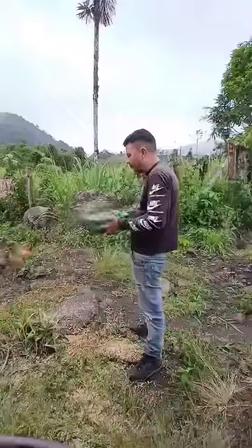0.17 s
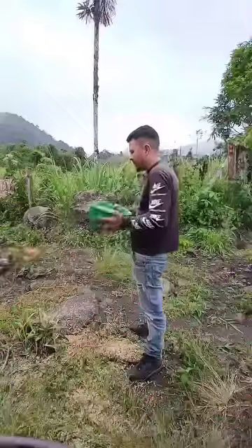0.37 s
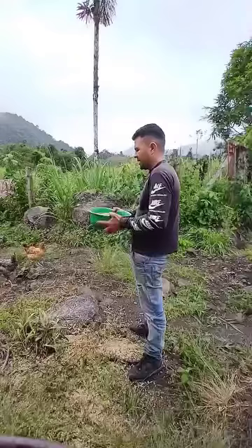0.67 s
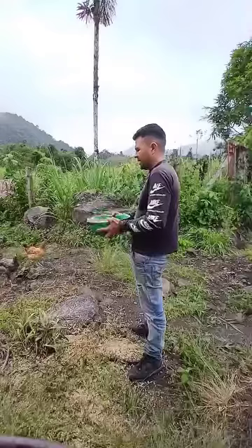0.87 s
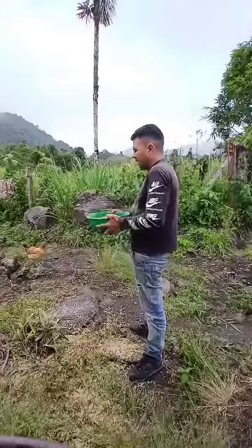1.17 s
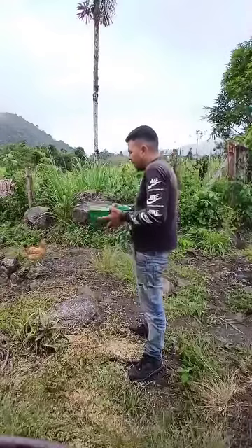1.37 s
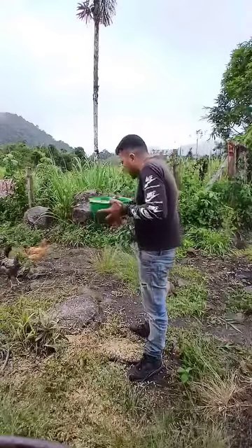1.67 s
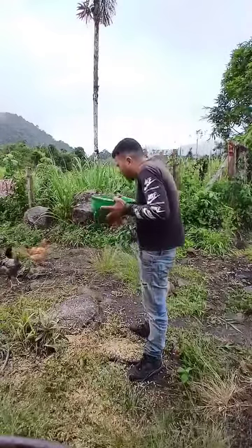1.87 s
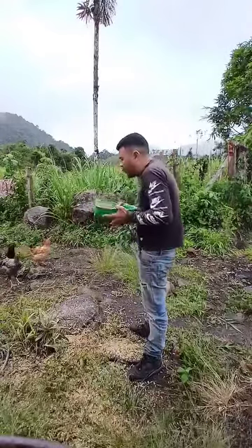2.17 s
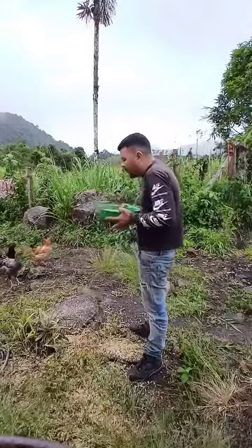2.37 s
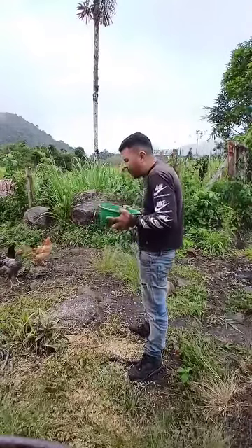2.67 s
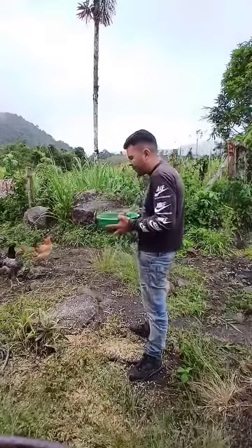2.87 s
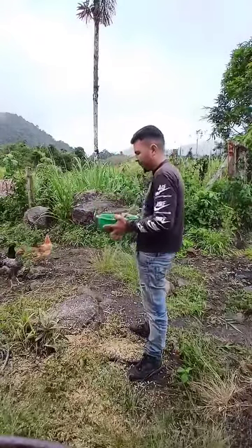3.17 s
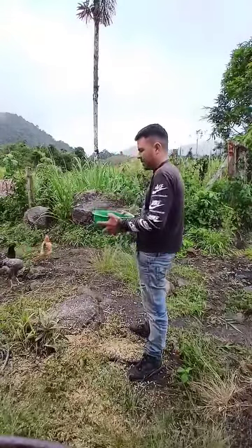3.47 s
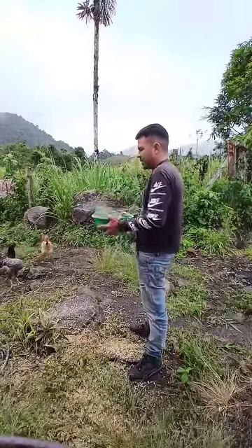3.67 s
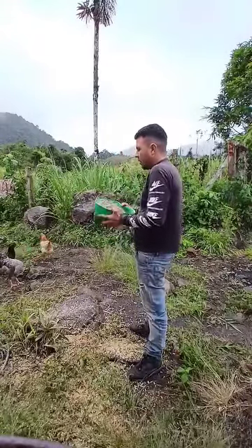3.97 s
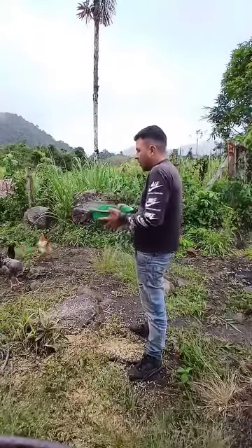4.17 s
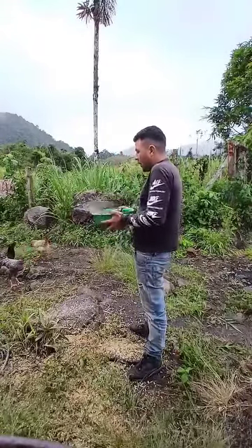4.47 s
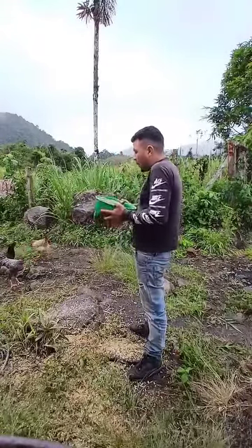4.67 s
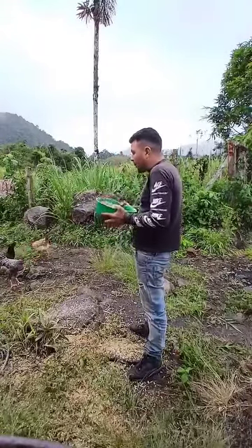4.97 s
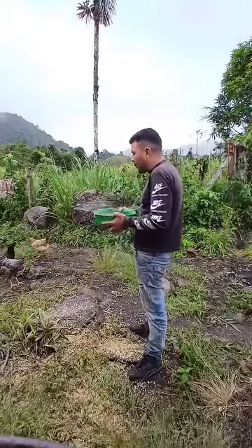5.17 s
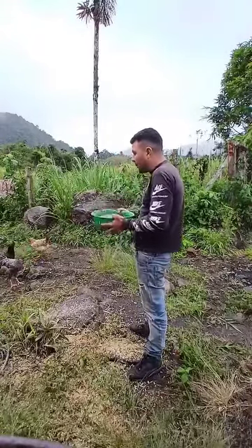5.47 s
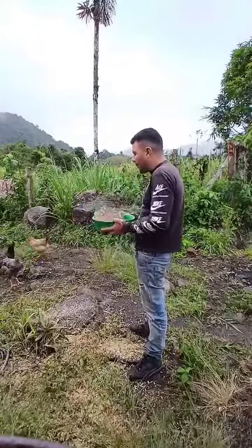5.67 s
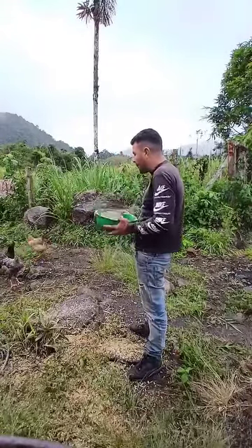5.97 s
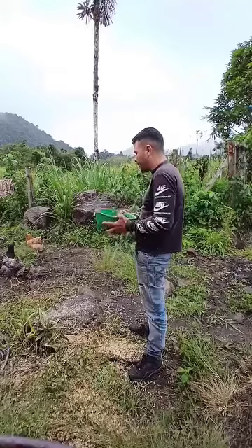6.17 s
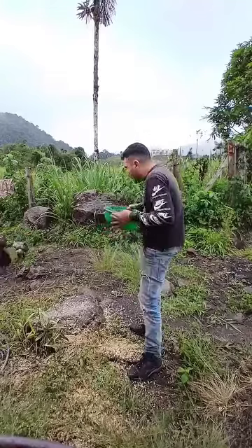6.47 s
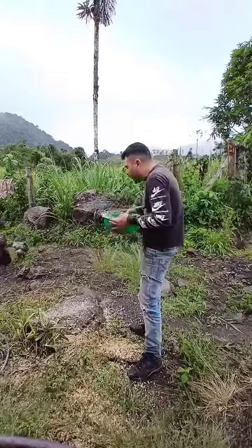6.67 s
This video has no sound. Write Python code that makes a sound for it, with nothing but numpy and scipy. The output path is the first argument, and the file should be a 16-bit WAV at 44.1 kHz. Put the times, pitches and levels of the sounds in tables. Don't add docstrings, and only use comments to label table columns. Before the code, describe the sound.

Steady rhythmic shaking of dried beans in a small plastic bowl, thudding and rattling, with a few faint hen clucks in open air.

```python
import sys
import numpy as np
from scipy import signal
from scipy.io import wavfile
from scipy.ndimage import uniform_filter1d

SR = 44100
rng = np.random.default_rng(int(sys.argv[2]) if len(sys.argv) > 2 else 0)


def generate_wav(signal):
    frames = np.transpose(np.atleast_2d(signal))
    scaled = np.clip(frames, -1, 1) * 32767
    pcm = np.round(scaled).astype(np.int16)
    wavfile.write(sys.argv[1], SR, pcm)


def how_loud(loudness_db):
    steps = np.asarray(loudness_db, float) / 20
    return 10 ** steps


N = 300321

# time in seconds, rattle peak in dB, husk peak in dB.
BEAN_DROPS = [(0.108, -35, -48.5), (0.653, -40.5, -59), (1.29, -40.5, -50), (1.331, -49.5, -56.5),
              (1.575, -50, -80), (1.696, -31, -71), (1.821, -43, -66), (2.797, -16, -34), (2.885, -44, -67),
              (2.936, -40, -73), (3.08, -16, -39), (3.386, -23, -48), (3.462, -36.5, -43),
              (3.799, -36.5, -57), (4.109, -36.5, -50), (4.306, -39.5, -68), (4.443, -24, -45),
              (4.536, -32, -47.5), (4.62, -47, -68.5), (4.782, -17.5, -34), (4.907, -38.5, -65.5),
              (5.197, -48, -62), (5.411, -16.5, -32.5), (5.727, -26, -50), (5.794, -39.5, -53),
              (5.914, -40, -60), (6.146, -37, -54), (6.548, -37.5, -60), (6.71, -29, -58),
              (6.769, -30, -51)]
# frequency in Hz, likeness from 0 to 1.
PORT_LIKENESS = [(60, .72), (250, .75), (500, .98), (800, .9), (1100, .8), (1400, .5), (1900, .35),
                 (3000, .7), (4500, .3), (7000, .3), (8200, .7), (9500, .3)]


def beans():
    # frequency in Hz, level in dB.
    bottom_colour = [(400, -9), (440, -20), (480, 4.5), (520, -2.5), (565, 8.5), (610, -1), (650, -6.5)]
    wall_colour = [(600, -30), (720, 9), (800, -2), (900, 4.5), (1000, 1), (1200, -3)]
    rattle_colour = [(1100, -21.5), (1450, -5), (1800, -1.5), (2100, -3), (2350, 2), (3100, -2.5),
                     (3500, -5.5), (3900, -7.5), (4600, -12.5)]
    husk_colour = [(4500, 0.5), (5400, 2.5), (5900, -2.5), (6800, -6.5), (7700, -5), (8200, -14),
                   (9400, -21), (10000, 3.5)]
    # time in seconds, peak in dB, pitch in Hz.
    thuds = [(0.042, -5.5, 729), (0.454, -14, 568), (0.8, 1.5, 709), (1.079, -29, 595), (1.389, -3, 680),
             (1.672, -11.5, 816), (1.967, 6, 844), (2.187, -26, 755), (2.208, 0, 750), (2.466, -5.5, 715),
             (2.754, -1.5, 710), (3.025, -36, 534), (3.041, -34.5, 735), (3.334, 5.5, 563),
             (3.682, -33.5, 736), (4.038, -3.5, 780), (4.389, -2, 620), (4.396, -2.5, 704), (4.739, 0, 762),
             (5.046, 5, 535), (5.361, -4.5, 792), (5.691, -11.5, 710), (6.007, 0.5, 765),
             (6.318, -5.5, 920), (6.608, 4.5, 700), (6.624, -16, 760)]

    bottom, wall, rattle, husk = tosses()
    _, rattle_peak_db, husk_peak_db = np.transpose(BEAN_DROPS)
    rattle = with_drops(rattle - 0.6, rattle_peak_db - 2.5, t60=0.023)
    husk = with_drops(husk + 2.1, husk_peak_db + 3.5, t60=0.015)

    heap = contacts(bottom_colour, bottom - 1.5, per_s=2000, spread_db=3.0, cycles=18.1,
                    patchy_db=1.5, lumpy_db=-5.0, even_s=0.015, count=10)
    heap += contacts(wall_colour, wall - 9.5, per_s=3000, spread_db=0.5, cycles=17.5,
                     patchy_db=5.0, lumpy_db=3.0, even_s=0.015, count=10)
    heap += contacts(rattle_colour, rattle, per_s=11000, spread_db=1.5, cycles=97.5,
                     patchy_db=2.5, lumpy_db=2.5, even_s=0.013, count=22)
    heap += contacts(husk_colour, husk, per_s=16000, spread_db=-2.5, cycles=132,
                     patchy_db=3.0, lumpy_db=7.5, even_s=0.0055, count=16)
    heap += blows(thuds, offset_db=-17.5, cycles=13.8)
    return small_bowl(heap)


def tosses():
    # start in seconds, bottom in dB, wait for the wall in seconds,
    # wall in dB, beans left rolling in dB.
    landings = [(0.044, -28.5, 0.01, -26.5, -48.5), (0.452, -27, 0.017, -26.5, -49.5),
                (0.783, -30, 0.023, -32, -54), (1.075, -34, 0.017, -32.5, -52.5),
                (1.382, -32.5, 0.013, -29, -61), (1.659, -51, 0.022, -44, -41.5),
                (1.951, -34.5, 0.013, -27, -63), (2.208, -36, 0.0025, -31, -55.0),
                (2.474, -34, 0.018, -26.5, -51.5), (2.755, -32.5, 0.014, -26, -52.5),
                (3.028, -30.0, 0.019, -23, -57), (3.34, -29, 0.021, -25, -53),
                (3.674, -25.5, 0.02, -22.5, -53), (4.035, -28.5, 0.014, -22.5, -52.5),
                (4.378, -25.5, 0.02, -23, -51.5), (4.728, -29.5, 0.018, -22.5, -50.5),
                (5.039, -25.5, 0.02, -24.5, -52.5), (5.353, -32.5, 0.018, -24, -53.0),
                (5.68, -31, 0.012, -20, -52), (6.003, -28.5, 0.019, -24.5, -53),
                (6.314, -39.5, 0.0071, -30.5, -51.5), (6.591, -29.5, 0.013, -22.5, -47)]
    # start in seconds, length in seconds, rattle in dB,
    # bean trickle left in dB, husk trickle left in dB.
    slides = [(0.038, 0.074, -26.5, -58.5, -62.5), (0.443, 0.092, -27, -54.5, -62),
              (0.798, 0.038, -27.0, -68.0, -67.5), (1.092, 0.027, -29, -59, -66),
              (1.391, 0.025, -27, -64.5, -84.5), (1.681, 0.0048, -42, -53.0, -59.5),
              (1.958, 0.029, -28, -55, -60), (2.214, 0.034, -28.5, -61.5, -63),
              (2.49, 0.043, -26.5, -58.0, -61), (2.758, 0.054, -28, -56.5, -63.5),
              (3.037, 0.055, -27.5, -51.5, -71), (3.33, 0.063, -28, -71.5, -68),
              (3.667, 0.072, -27.5, -58.0, -70.0), (4.018, 0.09, -29, -62, -77),
              (4.366, 0.078, -27, -48.5, -60.5), (4.709, 0.08, -29.5, -50.5, -61),
              (5.023, 0.079, -29, -47.5, -60.5), (5.35, 0.069, -28.5, -56.5, -59.5),
              (5.671, 0.066, -25.5, -49, -60.5), (6.0, 0.064, -26.5, -53, -61),
              (6.327, 0.0022, -23.5, -54.0, -60.5), (6.593, 0.051, -24.5, -36, -50.5)]
    # first beans' rise in dB/s, how far they lie under the peak in dB,
    # main rise in dB/s, swell in dB/s, fall in dB/s, its quickening in dB/s2, trickle fade in dB/s.
    bottom_moves = (390, 18, 740, 18, 267, 740, 33)
    wall_moves = (274.5, 9.5, 489, -54, 270, 599.5, 24)
    rattle_moves = (407, 8.8, 640, 82.4, 304, 870, 29.5)
    husk_moves = (400, 33, 537, 17, 265, 1300, 39.4)
    bottom_hold_s, wall_hold_s, husk_lag_s = 0.012, 0.0077, 0.0056
    bottom_roll_db, husk_under_db = -15, -14

    land_s, bottom_db, wall_lag_s, wall_db, roll_db = np.transpose(landings)
    slide_s, length_s, rattle_db, trickle_db, chaff_db = np.transpose(slides)
    bottom = stream(land_s, bottom_hold_s, bottom_db, roll_db + bottom_roll_db, bottom_moves)
    wall = stream(land_s + wall_lag_s, wall_hold_s, wall_db, roll_db, wall_moves)
    rattle = stream(slide_s, length_s, rattle_db, trickle_db, rattle_moves)
    husk = stream(slide_s + husk_lag_s, length_s, rattle_db + husk_under_db, chaff_db, husk_moves)
    return bottom, wall, rattle, husk


def stream(start_s, hold_s, peak_db, trickle_db, moves):
    first, under_db, rise, swell, fall, quicken, fade = moves
    since = np.arange(0, N + 64, 64) / SR - start_s[:, None]
    hold = np.broadcast_to(hold_s, start_s.shape)[:, None]
    peak = peak_db[:, None]
    after = since - hold
    climb = rise * np.minimum(since, 0) + swell * np.clip(after, -hold, 0)
    drop = -(fall + quicken * np.abs(after)) * after
    main = peak + np.minimum(climb, drop)
    early = peak - under_db + np.minimum(first * since, -2000 * since)
    late = trickle_db[:, None] + np.minimum(-fade * after, 2000 * after)
    power = np.sum(how_loud(2 * main) + how_loud(2 * early) + how_loud(2 * late), axis=0)
    return np.interp(np.arange(N) / 64, np.arange(len(power)), 10 * np.log10(power + 1e-10))


def with_drops(level_db, peaks_db, t60):
    hits = np.zeros(N)
    hits[[round(row[0] * SR) for row in BEAN_DROPS]] = how_loud(peaks_db)
    dying = signal.lfilter([1], [1, -how_loud(-60 / (t60 * SR))], hits)
    return 20 * np.log10(how_loud(level_db) + uniform_filter1d(dying, size=90))


def contacts(colour, level_db, per_s, spread_db, cycles, patchy_db, lumpy_db, even_s, count):
    crowd = np.clip(how_loud(0.45 * (level_db - level_db.max())), 0.45, 1)
    born = rng.random(N) < per_s * crowd / SR
    size = how_loud(spread_db * np.minimum(rng.exponential(1, N), 4)) / np.sqrt(crowd)
    sign = rng.choice([-1., 1.], (2, N))
    dealt = rng.integers(0, count, N)
    out = 0
    for k, hz in enumerate(np.geomspace(colour[0][0], colour[-1][0], count)):
        at = np.flatnonzero(born & (dealt == k))
        strength = hz * how_loud(at_hz(colour, hz) + patchy_db * drift(5.6, at)) * size[at]
        alike = np.clip(at_hz(PORT_LIKENESS, hz), 0, 1)
        heard = np.zeros((2, N))
        heard[0, at] = strength * sign[0, at]
        heard[1, at] = strength * (alike * sign[0, at] + np.sqrt(1 - alike ** 2) * sign[1, at])
        out = out + ring(heard, hz, cycles)
    flow = uniform_filter1d(np.mean(rms_one(out) ** 2, axis=0), max(round(even_s * SR), 1))
    lumps_db = lumpy_db * (0.6778 - crowd) * drift(23.0)
    return rms_one(out / np.sqrt(flow + 0.11)) * how_loud(level_db + lumps_db)


def blows(rows, offset_db, cycles):
    span = 2000
    out = np.zeros(N + span)
    soften = np.minimum(np.arange(span) / (0.0034 * SR), 1)
    for s, peak_db, hz in rows:
        at = round(s * SR)
        rung = ring(signal.unit_impulse(span), hz, cycles)
        out[at:at + span] += how_loud(peak_db + offset_db) * rung * soften
    return out[:N]


def small_bowl(heap):
    body = signal.sosfilt(signal.cheby1(5, 1, 480, "high", fs=SR, output="sos"), heap)
    skirt = signal.sosfilt(signal.butter(2, 290, "high", fs=SR, output="sos"), heap)
    return body + how_loud(-12) * skirt + how_loud(-17.5) * heap


def ring(clicks, hz, cycles):
    width_hz = np.log(1000) / np.pi * hz / cycles
    return signal.lfilter([0, np.sin(2 * np.pi * hz / SR)], poles(hz, width_hz), clicks + 1e-18)


def poles(hz, width_hz):
    r = np.exp(-np.pi * width_hz / SR)
    return [1, -2 * r * np.cos(2 * np.pi * hz / SR), r * r]


def drift(rate, at=None):
    r = np.exp(-80 * np.pi * rate / SR)
    slow = signal.lfilter([1], [1, -2 * r, r * r], rng.standard_normal(N // 40 + 2002))[2000:]
    where = np.arange(N) if at is None else at
    return np.interp(where / 40, np.arange(len(slow)), rms_one(slow))


def rms_one(x):
    return x / np.sqrt(np.mean(x ** 2) + 1e-20)


def at_hz(points, hz):
    table_hz, value = np.transpose(points)
    return np.interp(np.log(hz), np.log(table_hz), value)


def delay(x, seconds):
    return np.interp(np.arange(N) - seconds * SR, np.arange(N), x, left=0)


def hen():
    # start in seconds, length in seconds, start pitch in Hz, end pitch in Hz, level in dB.
    clucks = [
        (1.724, 0.057, 371, 310, -54.5),
        (1.798, 0.045, 405, 347, -56),
        (1.852, 0.078, 326, 368, -60),
        (5.733, 0.13, 377, 305, -59),
    ]
    out = np.zeros(N)
    for s, length, start_hz, end_hz, level_db in clucks:
        at, span = round(s * SR), round(length * SR)
        phase = 2 * np.pi * np.cumsum(np.linspace(start_hz, end_hz, span)) / SR
        voice = np.sin(phase) + how_loud(-4) * np.sin(2 * phase)
        out[at:at + span] += how_loud(level_db) * np.hanning(span) ** 0.5 * voice
    return out


def air():
    # frequency in Hz, level in dB per Hz.
    air_colour = [(30, -28), (50, -14), (78, 2.5), (110, -8), (250, -9), (500, -3.5), (900, -13.5),
                  (1300, -16), (2000, -12.5), (3000, -32.5), (4200, -33.5), (5500, -30.5), (7600, -25),
                  (9500, -20.5)]
    edges = 28 * 2 ** np.arange(0, 8.7, 1 / 3)
    white = rng.standard_normal((2, 2, N))
    out = 0
    for k, (low, high) in enumerate(zip(edges, edges[1:])):
        band = signal.butter(2, [low, high], "band", fs=SR, output="sos")
        one, other = signal.sosfilt(band, white[k % 2])
        hz = np.sqrt(low * high)
        alike = np.clip(0.88 * at_hz(PORT_LIKENESS, hz), 0, 1)
        gain = how_loud(at_hz(air_colour, hz) + 1.6 * drift(2.2))
        out = out + gain * np.array([one, alike * one + np.sqrt(1 - alike ** 2) * other])
    return how_loud(-64) * rms_one(out)


def knock():
    t = np.arange(N) / SR - 6.319
    return how_loud(-36) * np.exp(-(t / 0.0009) ** 2) * [[0.1], [1]]


def ports(sound):
    hollow_hz, hollow_width_hz, hollow_db = 808.6, 187, 4
    slot_hz, slot_width_hz, slot_db = 2490, 150, 3
    port_lag_s, ground_lag_s, echo_lag_s = 0.000364, 0.00295, 0.0024
    left, right = sound
    upper = signal.butter(2, 1500, "high", fs=SR, output="sos")

    a = poles(hollow_hz, hollow_width_hz)
    hollow = how_loud(hollow_db) * signal.lfilter([np.sum(a)], a, right)
    hollow = signal.lfilter(poles(430, 150), poles(430, 260), hollow)

    highs = signal.sosfilt(upper, right)
    a = poles(slot_hz, slot_width_hz)
    highs += how_loud(slot_db) * signal.lfilter(np.array([1, 0, -1]) * (1 - a[2]) / 2, a, highs)
    highs = signal.lfilter(poles(2078, 290), poles(2060, 820), highs)
    highs += how_loud(-6) * delay(highs, ground_lag_s)

    left = left - how_loud(-24) * delay(signal.sosfilt(upper, left), echo_lag_s)
    return np.array([left, hollow + how_loud(-2.0) * delay(highs, port_lag_s)])


def scene():
    return ports(beans() + hen() + air()) + knock()


def low_pass(x):
    return signal.sosfilt(signal.butter(12, 10380, fs=SR, output="sos"), x)


def record(dry):
    notched = signal.lfilter(poles(7600, 150), poles(7600, 800), dry)
    notched = signal.lfilter(poles(5870, 40), poles(5870, 200), notched)
    cut = signal.sosfilt(signal.butter(2, 45, "high", fs=SR, output="sos"), notched)
    cut = signal.sosfilt(signal.cheby2(16, 60, 10200, fs=SR, output="sos"), cut)
    return low_pass(cut)


dry = scene()
out = record(dry)
generate_wav(out)
```